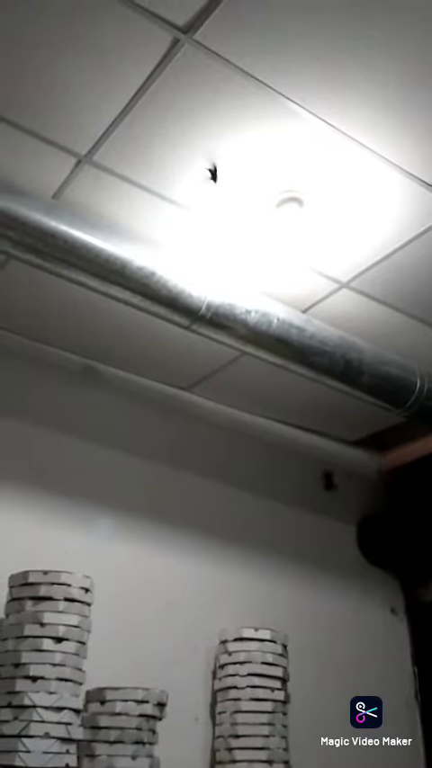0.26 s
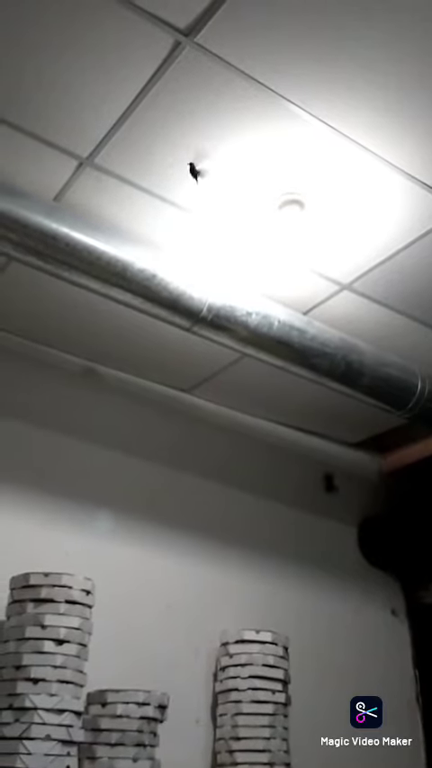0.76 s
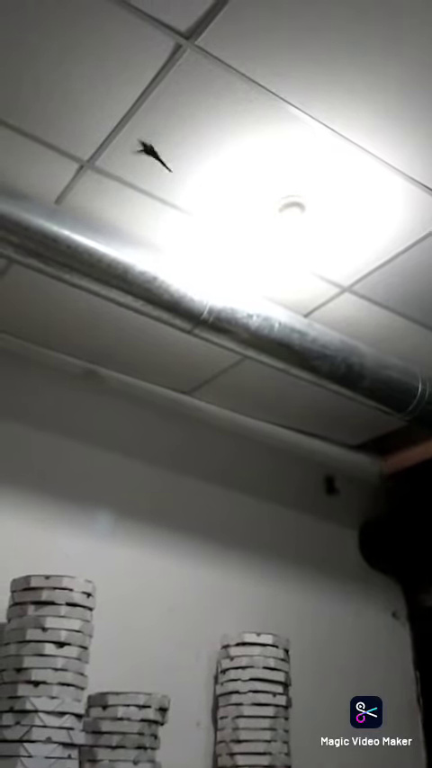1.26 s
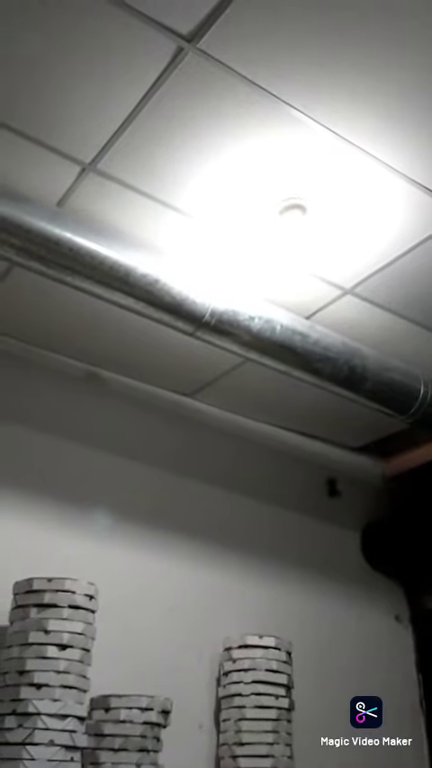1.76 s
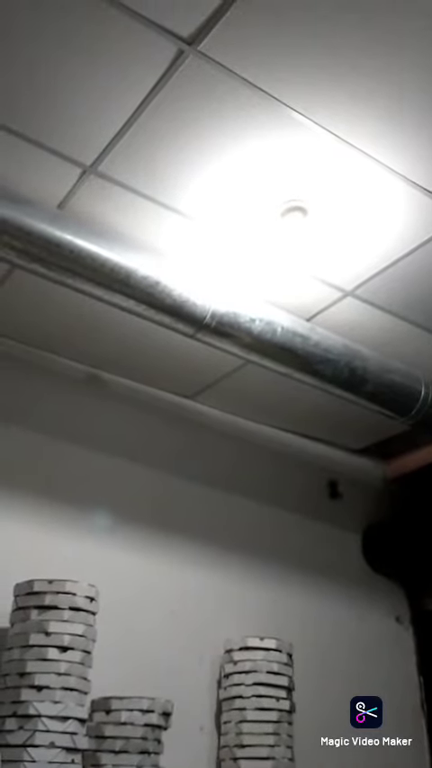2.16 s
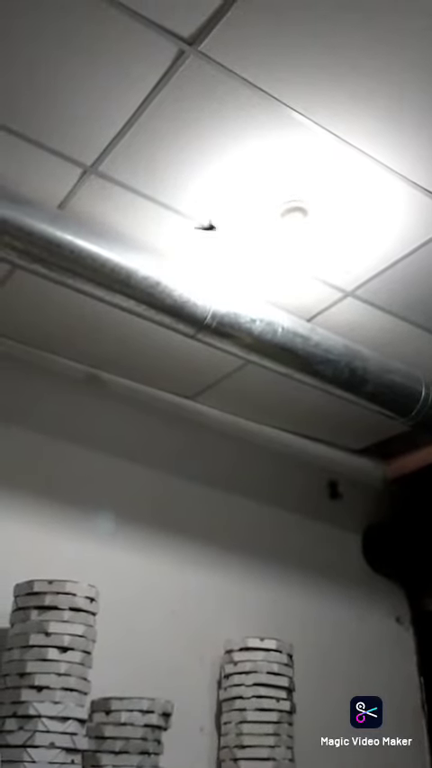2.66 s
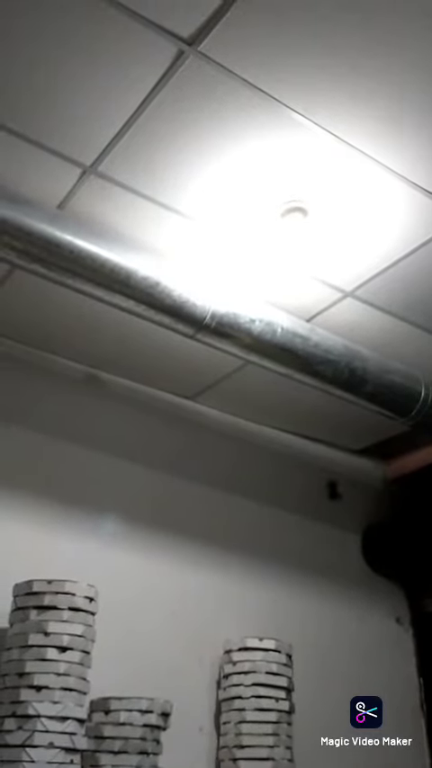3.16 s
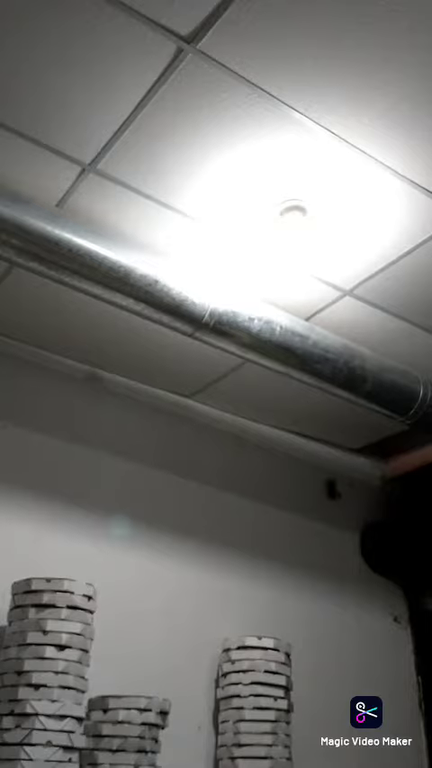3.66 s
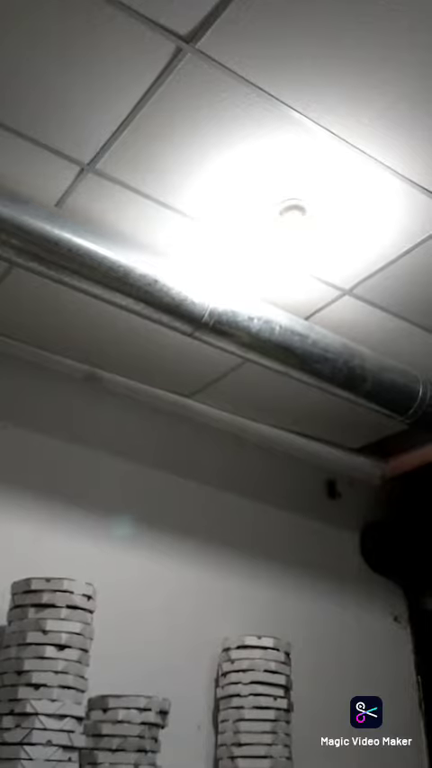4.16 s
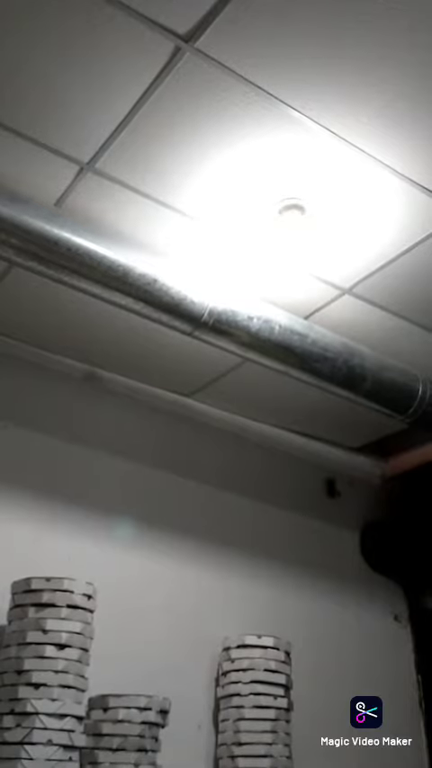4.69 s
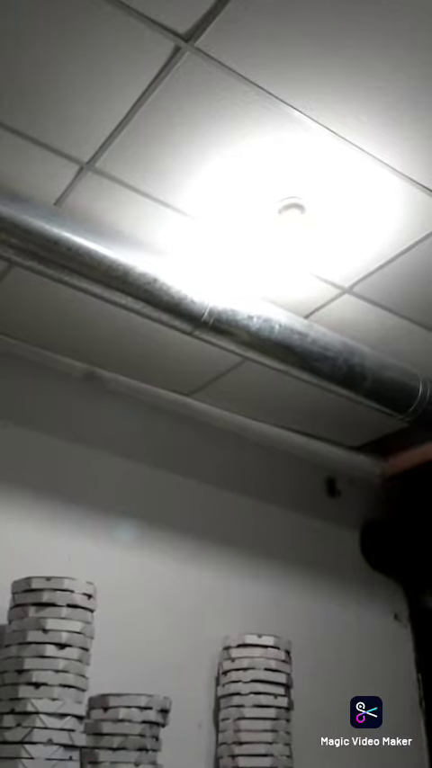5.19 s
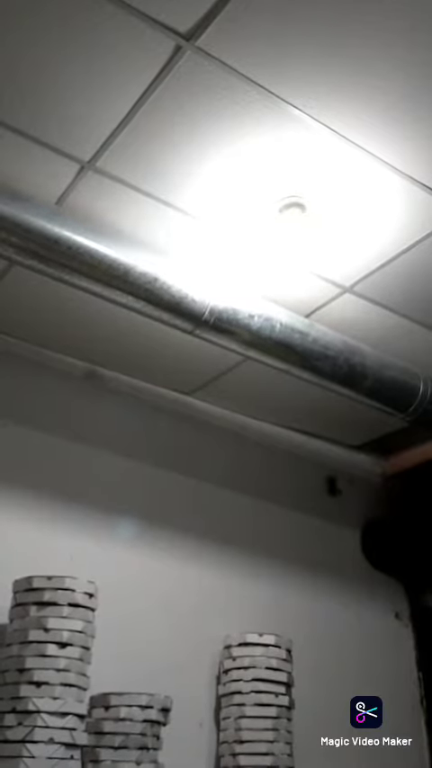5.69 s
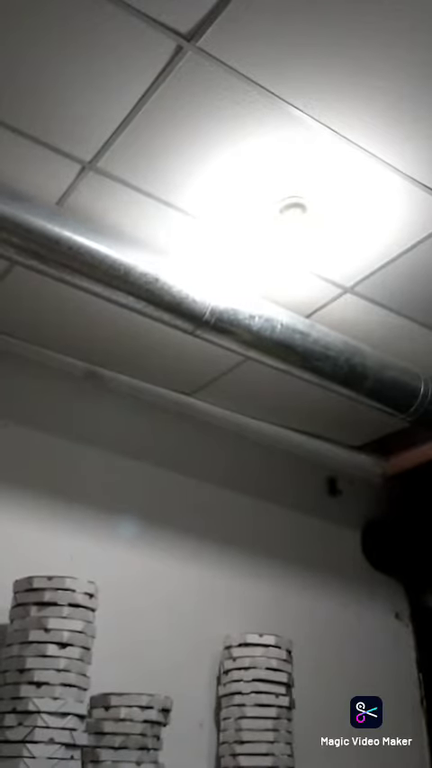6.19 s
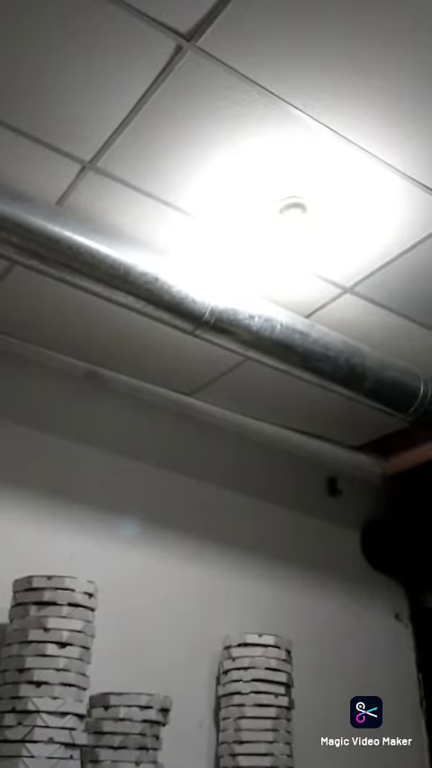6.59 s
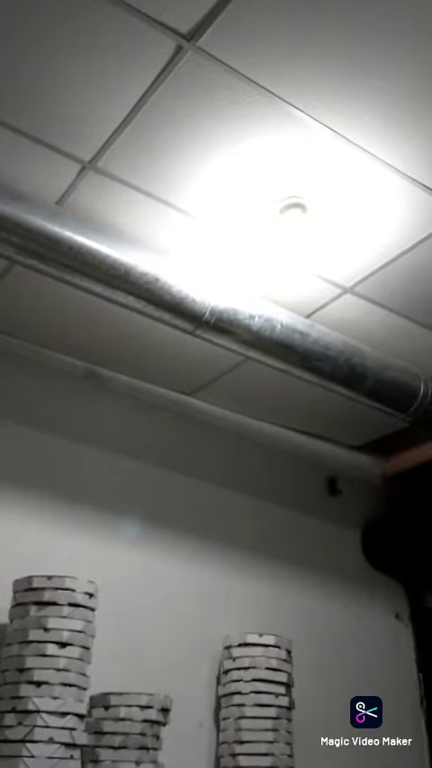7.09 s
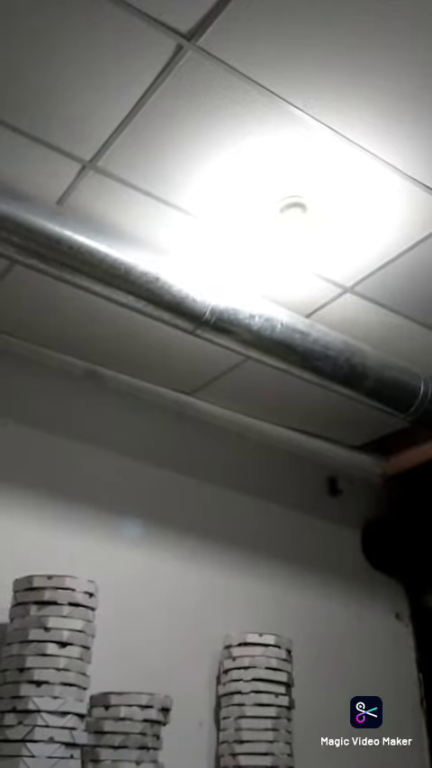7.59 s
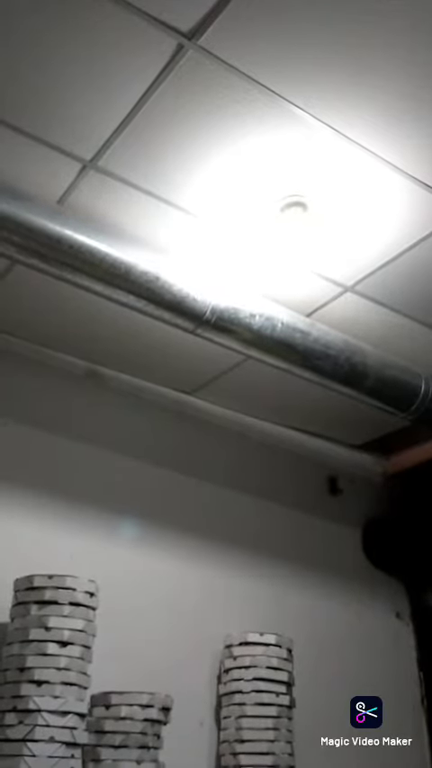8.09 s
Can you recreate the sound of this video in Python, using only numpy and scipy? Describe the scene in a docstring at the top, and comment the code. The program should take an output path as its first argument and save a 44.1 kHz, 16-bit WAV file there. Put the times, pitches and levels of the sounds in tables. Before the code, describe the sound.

A ventilation fan runs without pause in a room with a metal duct under the ceiling. A deep hum dominates, pulsing about five times a second as two close low tones beat. Dark, broad air rush surrounds it, with a very thin fluttering hiss above. A few faint hoots come near three seconds and tiny squeaks near the end. The stereo microphone hears a wide, roomy noise with centred bass.

```python
"""A low, steady motor hum throbs about five times a second under a broad rush of air: a ventilation fan.
The hum is a stack of mains multiples; the blade tone lies just below one of them and beats against it.
Shaped noise makes the air in the metal duct, with a thin, fluttering hiss above it.
Weak steady tones sing along from the rotor and panels; gliding, blurred tones make faint squeaks and hoots.
"""
import sys
import numpy as np
from scipy import signal
from scipy.fft import rfft, irfft
from scipy.io import wavfile
from scipy.ndimage import uniform_filter1d

SR = 44100
rng = np.random.default_rng(int(sys.argv[2]) if len(sys.argv) > 2 else 0)


def int16_out(signal):
    """Quantize to a 16-bit WAV file."""
    q = np.round(np.clip(np.atleast_2d(signal).T, -1, 1) * 32767)
    wavfile.write(sys.argv[1], SR, q.astype(np.int16))


N = 367794  # length in samples

# In all tables, side_db is left minus right and lead_rad is how far the left channel leads.

# Faint squeaks and hoots, one row per pulse:
# start_s, length_s, first_pitch_hz, last_pitch_hz, width_hz, level_db
SQUEAK_PULSES = [(1.695, .07, 5975, 5915, 30, -83.5), (1.754, .035, 5745, 5735, 12, -78),
                 (1.815, .052, 5730, 5800, 12, -79), (1.9, .07, 5745, 5750, 25, -84.5),
                 (2.986, 0.06, 719, 692, 15, -56.5), (3.282, .06, 585, 577, 20, -59),
                 (3.349, 0.055, 565, 577, 15, -52.5), (3.417, .05, 655, 645, 35, -59),
                 (7.48, .055, 2258, 2275, 15, -66.5), (7.548, .038, 2285, 2255, 15, -65),
                 (7.634, .095, 2245, 2280, 18, -68), (7.772, .06, 2255, 2262, 20, -68),
                 (7.84, .08, 2285, 2305, 25, -70), (7.54, .04, 6200, 6215, 30, -86),
                 (7.63, .05, 6210, 6190, 60, -85), (7.715, .11, 6180, 6150, 40, -87),
                 (7.56, .13, 4490, 4520, 45, -83.5), (7.775, .065, 4530, 4450, 35, -81),
                 (7.87, .2, 4450, 4510, 45, -83.3)]
# Likeness of the two microphones in diffuse noise: pitch_hz, likeness (limited to -1..1)
STEREO_LIKENESS = [(30, 5), (100, 1), (220, 0.7), (400, 1), (560, 0.3), (800, 0.4), (1200, -0.05),
                   (1650, 0), (2200, -0.2), (5000, 0.3)]
# Lead of the left microphone in diffuse noise: pitch_hz, lead_rad
STEREO_LEAD = [(30, 0.38), (600, -0.047), (1200, 0.58), (1650, 2), (3000, 1.67)]
# Left-right balance of diffuse noise: pitch_hz, side_db
STEREO_TILT = [(60, 1.5), (500, -0.5), (1150, 1.5), (1700, 3), (2700, 0), (5000, 0.5), (8000, -2),
               (13000, -4)]
# Relative colour of the duct air, before resonances, ripple and treble roll-off: pitch_hz, density_db_per_hz
RUSH_COLOUR = [(20, -24), (45, -19), (90, -1.4), (170, 1.66), (215, 1.6), (360, -4), (520, -8), (660, -9),
               (950, -10.5), (1400, -14), (2000, -19.5), (2850, -23), (3600, -33), (4400, -34),
               (5500, -40.5)]
# Duct resonances and notches: pitch_hz, width_hz, boost_db
DUCT_RESONANCES = [(41.4, 6.6, 8), (91, 11, 0), (226, 10, -10), (281, 16, -4), (361.4, 17, 4), (511, 27, 4),
                   (590, 36, 4), (620, 26, -4.5), (760, 24, -1), (833, 18, 3.5), (863, 37, -3.5),
                   (893, 31, 3.5), (1048, 27, 2.5), (1630, 86, 5)]
# Relative colour of the fine hiss, before ripple: pitch_hz, density_db_per_hz
HISS_COLOUR = [(1500, -17.5), (4000, 0.5), (6000, 0), (8700, -2), (10800, -7), (12500, -12.5), (14800, -23),
               (16000, -24)]
# Slow swells of the airflow above the rumble, around their mean: time_s, level_db
FLOW_SWELLS = [(0, 2.5), (.3, 1), (1.8, 0), (2.3, 1.2), (2.6, 1.5), (3.1, 1), (3.4, 0.5), (3.7, .8),
               (4.8, .3), (5.4, 1.2), (5.8, 0), (6.2, 0.6), (6.7, .5), (7.9, 1.3), (8.3, 1.5)]
# Slow surges of the low rumble, around their mean: time_s, level_db
RUMBLE_SURGES = [(0, 0.34), (2.4, -0.6), (3.0, -2), (3.5, 1.7), (5.0, -0.8), (7.5, 1.2), (8.3, -1)]
# Panels and other rotating parts that sing along: pitch_hz, level_db, side_db, lead_rad
SINGING_PARTS = [(92.7, -67.5, 1, 1), (129.8, -63, 3, -0.1), (148.7, -62.5, 1, -0.5),
                 (169.6, -61, -3.5, 0.2), (200.3, -62.5, 1, -1), (366, -71.5, -4.5, 2.2),
                 (394.3, -63, -1.5, 2), (504.7, -71, -1.5, 0.5), (543, -74.5, -1, 0.5), (656, -77, -1, 0.5),
                 (773, -70, 12, 1.5), (900, -71, -0.5, -0.5), (1137, -77.5, 0, 0.5), (1373, -80.5, 7, 1),
                 (1659, -79, 2, 2), (1660, -76.5, 7, 2.5), (2070, -87.5, -1.5, 1.5), (3800, -96, 3.5, 0),
                 (5006.5, -98.5, 1, -5)]
# Rotor whine, (shaft_multiple, mains_multiple): (level_db, side_db, lead_rad)
ROTOR_WHINE = {(3, 0): (-67, 5.5, 0.26), (4, 4): (-78, 2.3, .2), (4, 6): (-71, 1.8, -0.54),
               (14, 0): (-74, -7, -0.85), (15, 0): (-73, -5.5, -1.8), (37, 0): (-87, 8, 0),
               (46, 0): (-76.5, -3, 1.9), (47, 0): (-84.5, -4, -2.3), (50, 0): (-89, -5.5, 1),
               (56, 0): (-91.5, 3, .5), (58, 0): (-91, 11, -2)}
# How far the shaft strays from its nominal speed: time_s, offset_hz
SHAFT_WANDER_CURVE = [(0, .001), (2, -.02), (4.5, .002), (6.5, .011), (8.3, -.029)]
# Slow level changes of the blade tone, around their mean: time_s, level_db
BLADE_SWELLS = [(.1, 2), (.5, -2.7), (.8, 1), (1.7, -1.3), (2.3, 1.1), (2.8, -0.4), (3.7, 0.5),
                (4.05, -0.5), (4.5, 2), (4.8, -3), (5.25, 2.5), (5.55, -2.5), (6, 1.5), (6.5, -0.5),
                (6.9, 2.3), (7.5, -1.4), (7.95, 3), (8.25, -1.5)]
# Motor hum: mains_multiple, level_db, side_db, lead_rad
MOTOR_HUM = [(1, -70.5, -1.5, 0.17), (2, -38, 1.5, 0), (4, -54.5, -1.5, -0.24), (6, -56.5, 5, 0.026),
             (8, -71, -0.5, -0.41), (10, -72.5, -1, -0.98), (12, -70.5, 6, -0.97), (16, -72.5, 5.5, 1.6)]

MAINS_HZ, SHAFT_HZ = 59.985, 58.76  # SHAFT_HZ is nominal, before it wanders
THROB_S = 0.146  # a moment when blade tone and hum add up
BLADE_DB = -46  # before its swells
SLIP_HZ, SLIP_S = 1.262, 0.573  # rate of the rotor's slip, and one of its crests
LOPE_S = 0.087  # one crest of a weaker swell at twice that rate
SLIP_DEPTH, LOPE_DEPTH = 0.18, 0.085  # shares by which the blade tone swells

RUSH_DB, HISS_DB = -46.5, -74.5  # before swells and flutter
RIPPLE_DB = 1.18  # rms unevenness of the spectrum
# The hiss flutters in two steady rhythms, about 3.8 and 4.9 times a second.
SLOWER_HZ, FASTER_HZ = 3.786, 4.9
SLOWER_CREST_S, FASTER_CREST_S = 0.084, 0.06  # one crest of each
SLOWER_DB, FASTER_DB, FLARE_DB = 0.8, 0.5, 0.5
FLICKER_DB, FLICKER_PER_S = 0.94, 28  # random unevenness on top

SQUEAK_BLUR_HZ = 55  # a pulse's steady core is this over its width: wide pulses sink into their band
SQUEAK_RISE_S, SQUEAK_T60_S = 0.016, 0.36
EDGE_HZ = 15500  # top of the audible band


def amp(db):
    """Decibels to gain."""
    return 10 ** (np.asarray(db) / 20)


def unit(x):
    """Scales to rms 1."""
    return x / np.sqrt(np.mean(abs(x) ** 2) + 1e-20)


def over_hz(points, hz):
    """Reads a table on a log-frequency axis."""
    f, value = np.transpose(points)
    return np.interp(np.log(hz + 1), np.log(f + 1), value)


def swing(curve):
    """Turns a level curve into a gain around its mean."""
    time_s, level_db = np.transpose(curve)
    return amp(np.interp(np.arange(N) / SR, time_s, level_db - level_db.mean()))


def cycle(hz, crest_s):
    """A steady swing between -1 and 1 with a crest at the given moment."""
    return np.cos(2 * np.pi * hz * (np.arange(N) / SR - crest_s))


def drift(rate, where=slice(None)):
    """Random motion, rms 1 over the whole time, up to about rate changes a second; can return a part."""
    count = 4096
    hz = np.fft.rfftfreq(count, N / SR / count)
    slow = irfft(rfft(rng.standard_normal(count)) * np.exp(-(hz / rate) ** 2))
    return np.interp(np.arange(N)[where], np.linspace(0, N, count), unit(slow))


def tone(hz, level_db, side_db, lead_rad, waver):
    """A tone with trembling phase; standing waves give each microphone its own level and phase."""
    turns = np.cumsum(np.broadcast_to(hz / SR, N))
    turns -= turns[round(THROB_S * SR)]
    # whole turns are dropped to keep the phase precise
    phase = np.float32(2 * np.pi * (turns - np.round(turns)) + waver * drift(3.0))
    channels = []
    for ear in (1, -1):  # left, right
        gain = np.sqrt(2) * amp(level_db + ear * side_db / 2)
        channels.append(gain * np.sin(phase + ear * lead_rad / 2))
    return np.array(channels)


def diffuse(colour_db, hz):
    """Room-filling turbulence: alike at both microphones in the bass, far less so in the treble."""
    left, other = rfft(rng.standard_normal((2, N)))
    same = np.clip(over_hz(STEREO_LIKENESS, hz), -1, 1)
    right = same * left + np.sqrt(1 - same ** 2) * other
    right = right * np.exp(-1j * over_hz(STEREO_LEAD, hz))
    side = amp(over_hz(STEREO_TILT, hz) / 2)
    return unit(irfft(np.array([left * side, right / side]) * amp(colour_db), N))


def squeaks():
    """Narrow tones glide a little, swell, hold and die away in the room, each in a fluttering band."""
    t, out = np.arange(N) / SR, np.zeros((2, N))
    for start, length, first_hz, last_hz, width, level_db in SQUEAK_PULSES:
        on = (t > start) & (t < start + length + SQUEAK_T60_S)
        age = t[on] - start
        turns = np.cumsum(np.interp(age, [0, length], [first_hz, last_hz])) / SR
        rise = np.minimum(age / SQUEAK_RISE_S, 1)
        decay_db = 60 * np.maximum(age - length, 0) / SQUEAK_T60_S
        level = rise * amp(level_db - decay_db)
        for ear in out:
            # steady core plus random motion, drawn separately for each ear
            blur = unit(SQUEAK_BLUR_HZ / width + drift(width, on) + 1j * drift(width, on))
            ear[on] += np.sqrt(2) * level * (blur * np.exp(2j * np.pi * turns)).real
    return out


def flutter():
    """Gain of the hiss: two steady rhythms, a brief flare whenever their crests meet, and a little chance."""
    slower, faster = cycle(SLOWER_HZ, SLOWER_CREST_S), cycle(FASTER_HZ, FASTER_CREST_S)
    meeting = (np.maximum(slower, 0) * np.maximum(faster, 0)) ** 2
    rhythm_db = SLOWER_DB * slower + FASTER_DB * faster + FLARE_DB * meeting
    return amp(rhythm_db + FLICKER_DB * drift(FLICKER_PER_S))


def air():
    """Air rushes through the resonant duct, its rumble surging on its own; a thin hiss flutters above it."""
    hz = np.fft.rfftfreq(N, 1 / SR)
    peaks_db = sum(db / (1 + (2 * (hz - centre) / width) ** 2) for centre, width, db in DUCT_RESONANCES)
    # standing waves in the room ripple the spectrum
    smoothed = uniform_filter1d(rng.standard_normal(len(hz)), size=50)
    ripple_db = RIPPLE_DB * unit(uniform_filter1d(smoothed, size=35))
    treble_loss_db = 20 * np.log10(1 + (hz / 7000) ** 4)
    rush = diffuse(over_hz(RUSH_COLOUR, hz) + peaks_db + ripple_db - treble_loss_db, hz)
    # the rumble lies below about 450 Hz
    rumble = irfft(rfft(rush) / (1 + (hz / 450) ** 4), N)
    hiss = diffuse(over_hz(HISS_COLOUR, hz) + ripple_db, hz)
    duct = rumble * swing(RUMBLE_SURGES) + (rush - rumble) * swing(FLOW_SWELLS)
    return amp(RUSH_DB) * duct + amp(HISS_DB) * hiss * flutter()


def casing():
    """Panels and rotating parts sing weakly, each a tone with wandering phase."""
    return sum(tone(*row, waver=0.47) for row in SINGING_PARTS)


def shaft():
    """Turns of the shaft a second: the air load makes it run a hair slow or fast."""
    return SHAFT_HZ + np.interp(np.arange(N) / SR, *np.transpose(SHAFT_WANDER_CURVE))


def rotor():
    """The turning shaft whines at its own multiples and mixes with the mains hum."""
    speed = shaft()
    whine = 0
    for (turns, mains), (level_db, side_db, lead_rad) in ROTOR_WHINE.items():
        whine = whine + tone(turns * speed + mains * MAINS_HZ, level_db, side_db, lead_rad, waver=0.098)
    return whine


def blades():
    """The blade tone, just under the fourth mains multiple, makes a throb and swells as the rotor slips."""
    swell = 1 + SLIP_DEPTH * cycle(SLIP_HZ, SLIP_S) + LOPE_DEPTH * cycle(2 * SLIP_HZ, LOPE_S)
    blade_tone = tone(4 * shaft(), BLADE_DB, side_db=0, lead_rad=0.15, waver=0.077)
    return blade_tone * swell * swing(BLADE_SWELLS)


def motor():
    """Magnetic pull shakes the motor at multiples of the mains, most of all at twice the mains."""
    return sum(tone(order * MAINS_HZ, level_db, side_db, lead_rad, waver=0.045)
               for order, level_db, side_db, lead_rad in MOTOR_HUM)


def scene():
    """Sums every layer, from the far squeaks to the motor."""
    return squeaks() + air() + casing() + rotor() + blades() + motor()


def record(dry):
    """Eases the sound in and out over a few milliseconds and limits its band."""
    eased = dry * signal.windows.tukey(N, 0.002)
    lowpass = signal.firwin(511, EDGE_HZ, window=("kaiser", 9), fs=SR)
    return signal.oaconvolve(eased, lowpass[None], "same")


dry = scene()
out = record(dry)
int16_out(out)
```